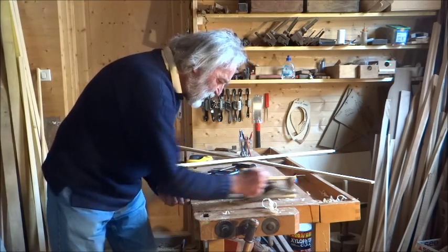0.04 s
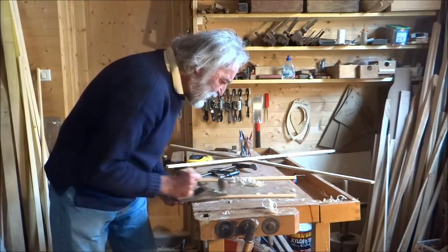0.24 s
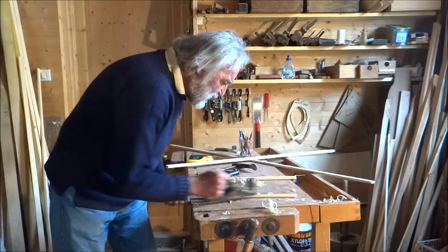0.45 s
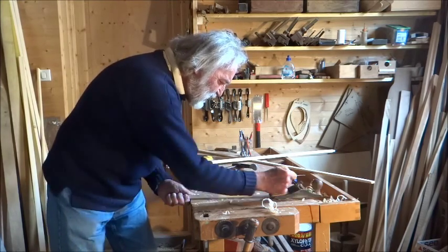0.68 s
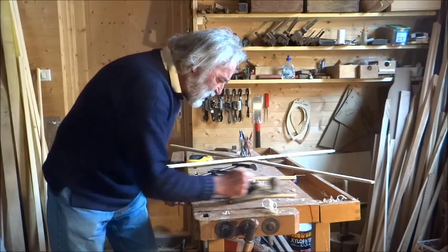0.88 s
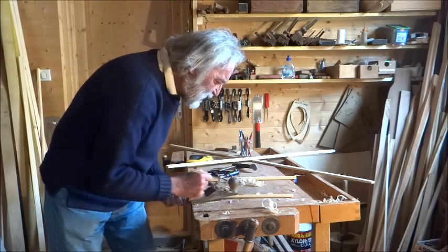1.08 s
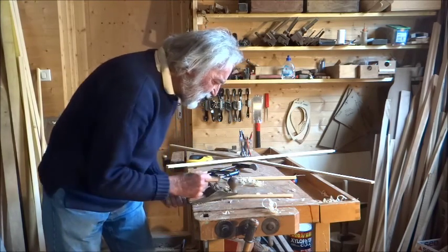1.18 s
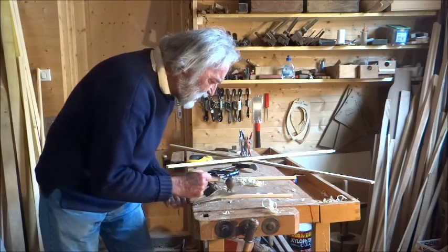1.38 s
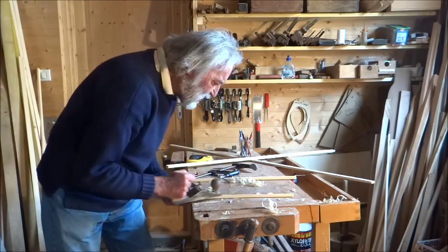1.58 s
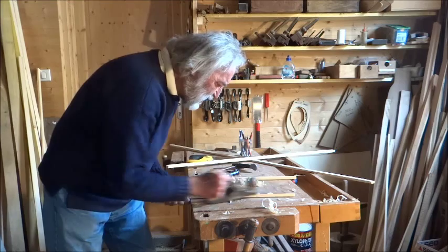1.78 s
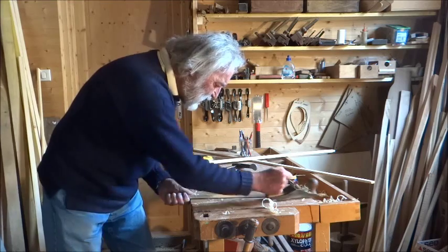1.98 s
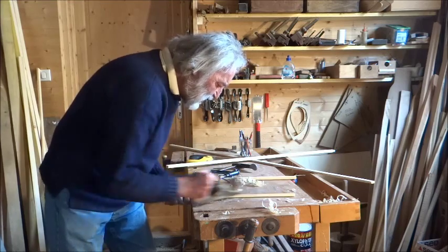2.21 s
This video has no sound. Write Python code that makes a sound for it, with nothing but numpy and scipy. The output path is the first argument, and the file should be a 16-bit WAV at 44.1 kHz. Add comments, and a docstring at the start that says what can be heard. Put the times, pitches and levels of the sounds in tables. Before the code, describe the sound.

Dry, hissy scraping of a small plane blade on wood, swelling and fading stroke by stroke, loudest early, almost silent in the middle, strong again near the end; short wooden room echo, very faint background air.

```python
"""A small hand plane is pushed and pulled along a thin stick on a workbench in a wooden workshop.
The blade tears fibres in a dense rain of slips, noise whose peak is tuned to the moving stroke;
slips and sole hiss excite the resonances of plane and stick, and the bench drones below.
Bands of separate noise, narrow or broad, swell and fade; the catching blade gives short damped rings,
plank walls answer with a decaying noise tail, and faint steady air noise lies under all."""
import sys
import numpy as np
from scipy import signal
from scipy.fft import rfft, irfft, next_fast_len
from scipy.io import wavfile
from scipy.ndimage import uniform_filter1d, map_coordinates

SR = 44100
rng = np.random.default_rng(int(sys.argv[2]) if len(sys.argv) > 2 else 0)


def materialize(psi):
    """Save the field psi as 16-bit PCM at rate SR to the path in sys.argv[1].

    A 1-D psi becomes a single channel; in a 2-D psi each row is a channel.
    """
    bounded = np.clip(np.atleast_2d(psi).T, -1, 1)
    quanta = np.round(bounded * 32767).astype(np.int16)
    wavfile.write(sys.argv[1], SR, quanta)


N = 99225  # samples

SLIPS_PER_S, SLIP_SPREAD_DB = 2500, 3.5
PATCH_DB = 3  # rms depth of random patches in time and frequency that roughen the friction noise
SCRAPE_WIDTH_OCTAVES = 0.82  # from the peak to 1/e of its amplitude
SKIRT_DB = -1.5  # broad part under the scrape's peak
BODY_DB = -7  # ringing over the direct sound
SWELL_STRETCH = 1.5  # rise and fall last longer than the loud part
SWELL_RISE = 0.94  # exponent under 1: the rise is quicker than the fall
AIR_DB, WALLS_DB, PAN_DB = -64, -7.5, -0.2
TICK_T60_S, TICK_DB, TICK_LOW_HZ = 0.054, -5.5, 700
CRACK = 0.26  # broad noise in a catch, against its ring
BITE_S = 0.4805  # the blade bites at once into the wood
GLIDE_S, GLIDE_DB = 0.059, -8.5  # just before, the sole only glides: how long, how much softer
LOW_HZ, TOP_HZ = 114, 10950  # the microphone's bass roll-off and band limit


def amp(db):
    """Decibel law: level in dB to amplitude gain."""
    return 10 ** (np.asarray(db) / 20)


def unit(x):
    """Power normalisation: bring to rms 1."""
    return x / np.sqrt(np.mean(x ** 2) + 1e-20)


def along(points, hz):
    """Logarithmic frequency scale: interpolate (Hz, value) points along it."""
    f, v = np.transpose(points)
    return np.interp(np.log(hz + 1), np.log(f + 1), v)


def wobble(rate):
    """Band-limited fluctuation: a smooth random curve with `rate` knots a second."""
    knots = rng.standard_normal(int(N * rate / SR) + 4)
    return map_coordinates(knots, [np.arange(N) * rate / SR])


def filtered(x, response):
    """Linear filtering: the spectrum of x times a complex response of frequency."""
    m = next_fast_len(N + SR // 2)
    return irfft(rfft(x, m) * response(np.fft.rfftfreq(m, 1 / SR)), m)[..., :N]


def coloured(x, spectrum):
    """Spectral shaping: x filtered by (Hz, dB) points, at rms 1."""
    return unit(filtered(x, lambda hz: amp(along(spectrum, hz))))


def slips(grainy, patch_db=PATCH_DB):
    """Stick-slip friction: random impulses of uneven size in noise, roughened in narrow random patches."""
    happens = rng.random(N) < SLIPS_PER_S / SR
    size = amp(SLIP_SPREAD_DB * rng.uniform(-0.13, 1, N))
    grains = happens * rng.choice([-1, 1], N) * size
    share = np.clip(grainy, 0, 1)  # share of the power in single slips
    friction = np.sqrt(share) * unit(grains) + np.sqrt(1 - share) * rng.standard_normal(N)
    z = signal.stft(friction, nperseg=1024)[2]
    field = uniform_filter1d(rng.standard_normal(z.shape), size=2, axis=0)  # over frequency
    field = uniform_filter1d(field, size=4, axis=1)  # over time
    return unit(signal.istft(z * amp(patch_db * unit(field)), nperseg=1024)[1][:N])


def ringing(x):
    """Modal resonance: direct sound plus the band-pass modes of plane and stick."""
    # Modes of plane and stick. Each row: frequency in Hz, width in Hz, relative level in dB.
    body = [(1365, 14, 7), (1446, 140, -14), (2585, 86, 4), (3840, 36, -2), (5430, 70, 5), (6200, 60, -7),
            (6650, 80, 0.5), (7100, 170, 1.5), (9000, 250, -3)]

    def response(f):
        modes = sum(amp(db) * 1j * f * w / (c * c - f * f + 1j * f * w) for c, w, db in body)
        return 1 + amp(BODY_DB) * modes

    return filtered(x, response)


def scrape(stroke_s, pitch_hz):
    """Moving formant: slips of the blade under a spectral peak that follows the stroke."""
    # Fixed colour of the scrape. Each row: frequency in Hz, relative level in dB.
    scrape_colour = [(200, -61), (450, -64), (700, -0.5), (1000, 6), (3000, 6), (3600, -21), (5000, -44),
                     (9000, -71)]
    hz, frames, z = signal.stft(slips(grainy=0.56), SR, nperseg=512)
    peak_hz = np.interp(frames, stroke_s, pitch_hz)
    off = np.log2((hz[:, None] + 1) / peak_hz) / SCRAPE_WIDTH_OCTAVES
    shape = (np.exp(-off ** 2) + amp(SKIRT_DB)) * amp(along(scrape_colour, hz))[:, None]
    shape = shape / np.sqrt(np.mean(shape ** 2, axis=0))  # equal power gain for every pitch
    return unit(ringing(signal.istft(z * shape, SR, nperseg=512)[1][:N]))


def sole_hiss():
    """Sliding friction: coloured slips of the sole over the wood excite the body modes."""
    # Colour of the hiss. Each row: frequency in Hz, relative level in dB.
    hiss_colour = [(1760, -34), (3000, -0.5), (3440, 0.5), (4760, -1), (5290, -3.5), (7000, -9),
                   (9100, -43), (15400, -120)]
    return unit(ringing(coloured(slips(grainy=0.4), hiss_colour)))


def hiss_top():
    """Broadband friction: the treble of the hiss, through the same body modes."""
    # Colour of the top. Each row: frequency in Hz, relative level in dB.
    top_colour = [(3650, -22), (6200, -1.5), (7040, -6.5), (7580, 2), (9060, 0), (10800, -7), (14000, -21),
                  (22000, -120)]
    return unit(ringing(coloured(slips(grainy=0.45, patch_db=3.5), top_colour)))


def bench_drone():
    """Structure-borne sound: slips filtered to the low band of the bench."""
    # Colour of the bench. Each row: frequency in Hz, relative level in dB.
    bench_colour = [(40, -50), (100, -17), (200, -5), (350, -1), (550, 2), (750, 4), (1000, 1), (1700, -75)]
    return coloured(slips(grainy=0.2, patch_db=1.5), bench_colour)


def plane():
    """Superposition: scrape, hiss, its top and the bench, each under its own level curve."""
    # One list for each movement of the hand. Each row: time in seconds, scrape level in dB,
    # scrape pitch in Hz, hiss level in dB, top of the hiss over the scrape in dB, bench level in dB.
    strokes = [
        [(0.0, -42.5, 1640, -52, -10, -52.5), (0.046, -52, 2230, -49.5, -6.5, -55.5),
         (0.116, -49, 2390, -47, 5, -58), (0.148, -38.5, 2270, -41.5, -3.5, -50),
         (0.224, -34.5, 2300, -39.5, -3, -58.5), (0.268, -35.5, 1460, -41.5, -4, -46),
         (0.304, -37.5, 1320, -43.5, -4.5, -49.5), (0.382, -55, 1410, -56.5, -2, -58.5),
         (0.39, -46, 1480, -53, -23, -60)],
        [(0.4, -53, 1890, -59, 0, -56.5), (0.464, -42, 2000, -39, 7, -59), (0.486, -35.5, 1850, -33, -3.5, -54),
         (0.564, -25.5, 2280, -30.5, -4.5, -51), (0.628, -19.5, 1650, -25.5, -14, -46),
         (0.686, -25.5, 1810, -31, -8, -34.5), (0.736, -36, 1050, -40.5, -9, -44.5),
         (0.78, -45.5, 1240, -52.5, -10.5, -51), (0.82, -53.5, 991, -53.5, -8, -61)],
        [(0.84, -51.5, 2230, -52.5, 0, -71), (0.876, -52, 1920, -52.5, 6, -59.5),
         (0.94, -45.5, 2370, -44.5, -0.5, -52.5), (0.984, -40, 1850, -44, -2, -60),
         (1.034, -38.5, 1410, -46.5, -5, -55), (1.074, -44.5, 1270, -48.5, -0.5, -67),
         (1.13, -50.5, 1640, -55, -1.5, -60), (1.276, -69, 1450, -68.5, -1, -75),
         (1.29, -84, 1410, -85, 9, -82)],
        [(1.31, -66.5, 1790, -95, 0, -86), (1.332, -66.5, 1970, -63, 7.5, -83),
         (1.374, -65.5, 2170, -63, 5.5, -81), (1.39, -54.5, 2060, -55.5, 1, -62),
         (1.438, -63, 1340, -67, -3, -65.5), (1.472, -67, 1900, -66, 0, -74),
         (1.578, -58, 1430, -61.5, -4.5, -65.5), (1.638, -61, 1920, -61.5, 5, -69),
         (1.7, -62, 1400, -66, -1.5, -77)],
        [(1.715, -56, 2020, -59, -4, -89), (1.729, -55, 1960, -57.5, 4.5, -52),
         (1.789, -29, 1810, -36, -15, -50.5), (1.863, -31, 2050, -31.5, -5, -58),
         (1.883, -27.5, 2080, -30.5, -8.5, -62), (1.909, -31.5, 2530, -34, -2.5, -47.5),
         (1.937, -33, 2350, -32, 1.5, -64), (1.963, -29.5, 2396, -29.5, -1, -38.5),
         (2.005, -36, 2200, -35, -1, -47), (2.06, -49.5, 1900, -52, -3.5, -51.5),
         (2.1, -55, 1760, -52.5, -2, -62.5)],
        [(2.115, -58.5, 2350, -54.5, 2.5, -67), (2.155, -50.5, 1920, -48, 3.5, -60),
         (2.193, -46.5, 2510, -45, 1, -63), (2.207, -43.5, 2400, -45, -3, -74), (2.221, -43, 1540, -43, 2, -55),
         (2.239, -35.5, 1350, -41.5, -7, -48), (2.25, -51.5, 1340, -40, -1, -55)],
    ]
    s, scrape_db, pitch_hz, hiss_db, top_db, bench_db = np.transpose(np.concatenate(strokes))
    t = np.arange(N) / SR

    def level(db, uneven_db):
        return amp(np.interp(t, s, db) + uneven_db * wobble(59.78))

    blade = scrape(s, pitch_hz) * level(scrape_db, uneven_db=0.5)
    sole = sole_hiss() * level(hiss_db, uneven_db=1.0)
    top = hiss_top() * level(scrape_db + top_db, uneven_db=1.52)
    bench = bench_drone() * level(bench_db, uneven_db=0.0)
    return (blade + sole) * before_bite() + top + bench


def noise_swells():
    """Band-pass noise: separate noise shaped to a narrow or broad band, swelling and fading."""
    # Swells of noise, narrow and singing or broad and rushing, with a few low thumps.
    # Each row: start of the loud part in seconds, its length in seconds, centre in Hz,
    # nominal width in Hz, rms level in dB.
    swells = [(0.01, 0.04, 247, 51.3, -59), (0.0125, 0.05, 120, 30.2, -62.5),
              (0.14, 0.025, 950, 300, -49.5), (0.185, 0.06, 2460, 603, -38.5),
              (0.24, 0.044, 1040, 340, -43), (0.253, 0.058, 2630, 80, -49.5),
              (0.295, 0.019, 1400, 400, -39), (0.34, 0.038, 1474, 80, -52), (0.48, 0.048, 240, 50, -57.5),
              (0.481, 0.042, 1760, 490, -33), (0.56, 0.042, 3060, 600, -28),
              (0.621, 0.02416, 1550, 120, -23), (0.641, 0.063, 1390, 80, -31.5),
              (0.644, 0.012, 1650, 400, -26.5), (0.694, 0.06, 520, 34.6, -39.5),
              (0.695, 0.034, 123, 30, -59), (0.785, 0.045, 540, 50, -55), (0.845, 0.059, 278, 149, -56.5),
              (0.9, 0.099, 249, 80, -65), (0.93, 0.037, 2570, 400, -48.5), (0.95, 0.039, 1370, 80, -49.5),
              (1.013, 0.062, 1350, 80, -45.5), (1.02, 0.047, 1173, 80, -44.5), (1.308, 0.18, 3920, 80, -67),
              (1.316, 0.13, 4980, 80, -66), (1.33, 0.11, 6250, 80, -70), (1.58, 0.065, 2490, 80, -70),
              (1.749, 0.13, 2547, 80, -42.5), (1.755, 0.057, 1315, 80, -42.5), (1.766, 0.048, 966, 80, -42),
              (1.775, 0.035, 1600, 398, -35.5), (1.815, 0.055, 1312, 79, -32),
              (1.82, 0.05, 2470, 500, -29.5), (1.88, 0.035, 3120, 500, -34),
              (1.95, 0.023, 3000, 300, -37.5), (1.95, 0.0516, 230, 78, -52.5),
              (1.974, 0.035, 2500, 80, -42), (2.1, 0.033, 6400, 80, -58), (2.13, 0.079, 229, 40, -62.5),
              (2.143, 0.04, 2545, 78.6, -49.5), (2.162, 0.027, 1370, 78.6, -44),
              (2.18, 0.033, 2630, 500, -39), (2.239, 0.021, 1340, 80, -32.5)]
    out, hz_axis = np.zeros(N + SR), np.fft.rfftfreq(16384, 1 / SR)
    for s, length, hz, width_hz, db in swells:
        n = round(SWELL_STRETCH * length * SR)
        peak = 1 / (1 + ((hz_axis - hz) / (abs(width_hz) / 2 + 1)) ** 2)
        band = irfft(rfft(rng.standard_normal(16384)) * peak)[:n]
        swell = np.sin(np.pi * (np.arange(len(band)) / n) ** SWELL_RISE)
        first = round((s + length / 2) * SR) - n // 2  # centred on the loud part
        out[first:][:len(band)] += amp(db) * unit(band * swell)
    return out[:N]


def air():
    """Partial coherence: faint steady noise made of two mixtures of the same two noises."""
    # Quiet of the workshop. Each row: frequency in Hz, relative level in dB.
    air_colour = [(18, -86), (30, -39), (115, -20), (210, -12), (268, -7), (335, -13.5), (1540, -14),
                  (1660, -13), (2580, -19), (10800, -31), (14000, -57), (22000, -120)]
    a, b = rng.standard_normal((2, N))
    return amp(AIR_DB) * coloured(np.array([a + 0.48 * b, a - 1.3 * b]), air_colour)


def walls(x):
    """Reverberation: convolution with noise whose frequencies each die at their own rate."""
    # Decay of the room. Each row: frequency in Hz, time to fall by 60 dB in seconds.
    decay_s = [(200, 0.14), (2000, 0.082), (10000, 0.16)]
    # Initial colour of the answer. Each row: frequency in Hz, relative level in dB.
    wall_colour = [(100, -10), (500, 7), (2000, 4), (10000, 4)]
    hz, t, z = signal.stft(rng.standard_normal((2, SR // 2)), SR, nperseg=256)
    fall_db = 60 * t / along(decay_s, hz)[:, None]
    tail = signal.istft(z * amp(along(wall_colour, hz)[:, None] - fall_db), SR, nperseg=256)[1]
    delayed = np.pad(x, (200, 0))[None]  # samples before the walls answer
    return signal.fftconvolve(delayed, tail / np.linalg.norm(tail[0]), axes=1)[:, :N]


def ticks():
    """Damped oscillation: each catch of the blade is a short decaying ring with a noisy crack."""
    # The blade catches. Each row: time in seconds, level in dB before TICK_DB and filtering, pitch in Hz.
    catches = [(0.0463, -36.5, 3190), (0.389, -40, 3130), (0.4803, -16.5, 1898), (0.622, -11, 1527),
               (1.323, -49, 4000), (1.3813, -42.5, 4060), (1.715, -49, 2400)]
    out, t = np.zeros(N + SR), np.arange(SR // 10) / SR
    for s, db, hz in catches:
        ring = np.sin(2 * np.pi * hz * t) + CRACK * rng.standard_normal(len(t))
        out[round(s * SR):][:len(t)] += amp(db + TICK_DB - 60 * t / TICK_T60_S) * ring
    return ringing(filtered(out[:N], lambda f: (1j * f / (TICK_LOW_HZ + 1j * f)) ** 2))


def before_bite():
    """Amplitude modulation: a gain that sinks during the glide and is full again at the bite."""
    u = (BITE_S - np.arange(N) / SR) / GLIDE_S  # glide times left until the bite
    return amp(GLIDE_DB * np.clip(1 - u, 0, 1) * (u > 0))


def scene():
    """Superposition of direct and reverberant fields: plane near the middle, room and air around it."""
    work = plane() + ticks() + noise_swells() * before_bite()
    direct = work * amp([[PAN_DB / 2], [-PAN_DB / 2]])
    return direct + amp(WALLS_DB) * walls(work) + air()


def record(dry):
    """Band limiting: a second-order bass roll-off and nothing from the upper limit on."""
    return filtered(dry, lambda hz: (hz < TOP_HZ) * (1j * hz / (LOW_HZ + 1j * hz)) ** 2)


dry = scene()
out = record(dry)
materialize(out)
```